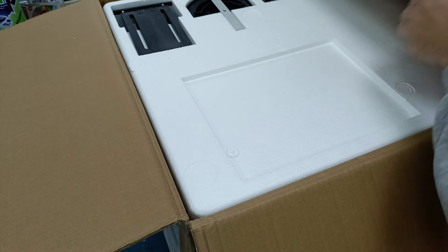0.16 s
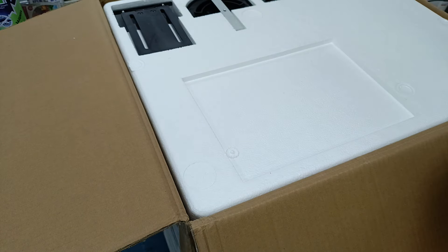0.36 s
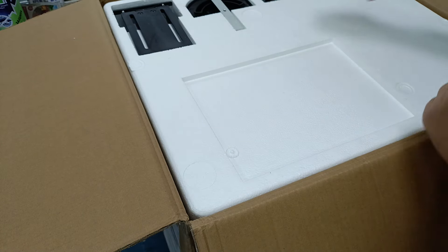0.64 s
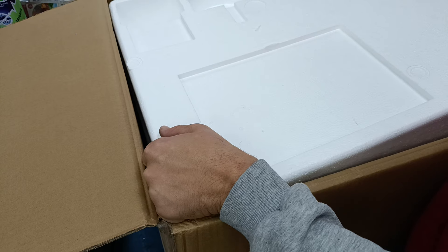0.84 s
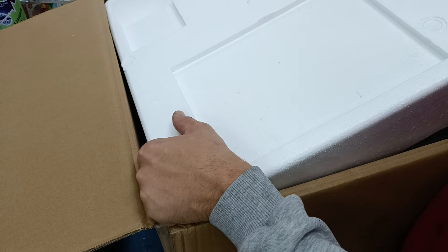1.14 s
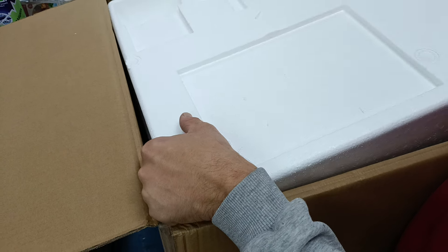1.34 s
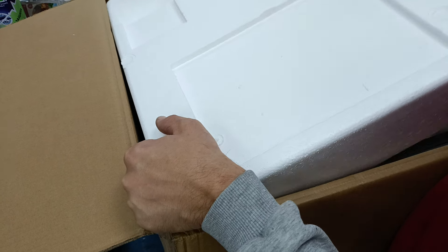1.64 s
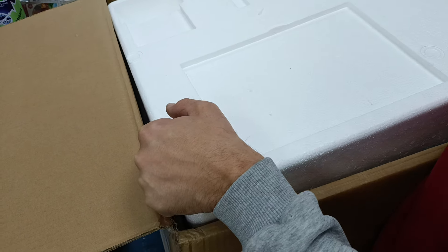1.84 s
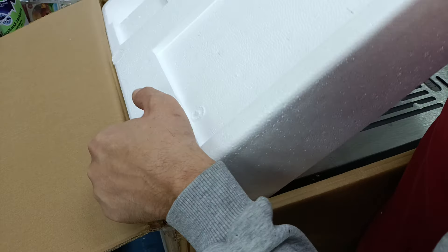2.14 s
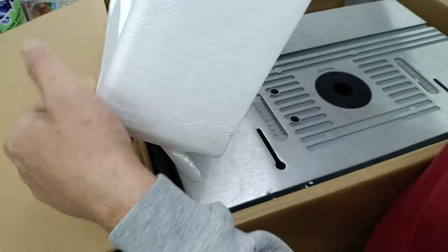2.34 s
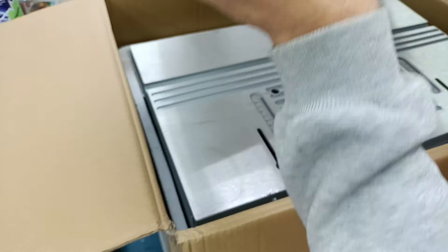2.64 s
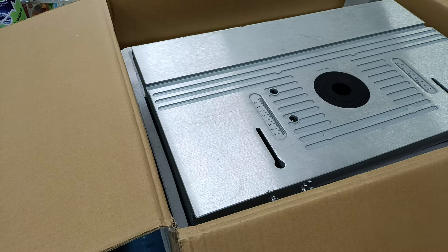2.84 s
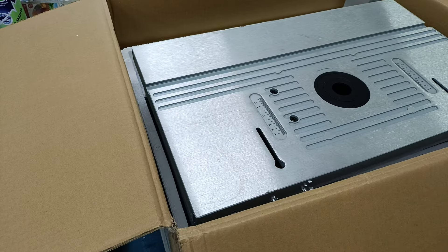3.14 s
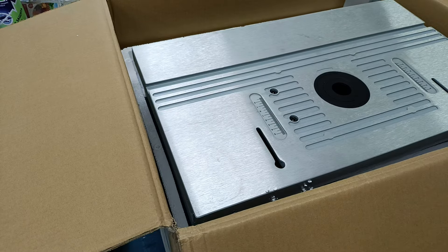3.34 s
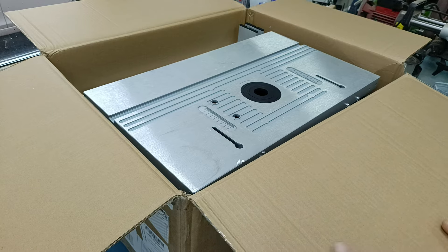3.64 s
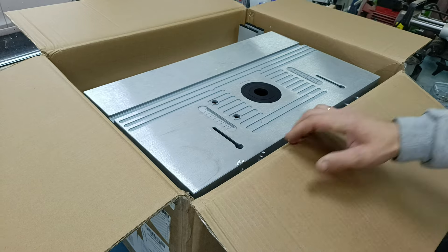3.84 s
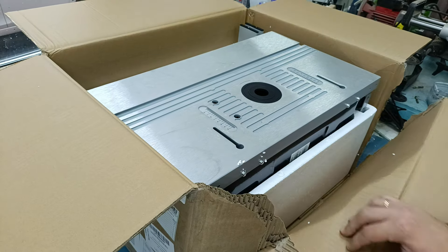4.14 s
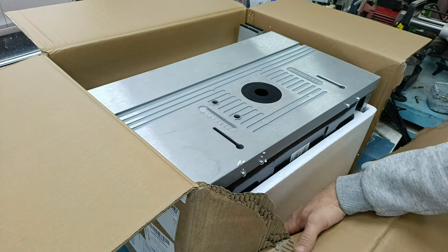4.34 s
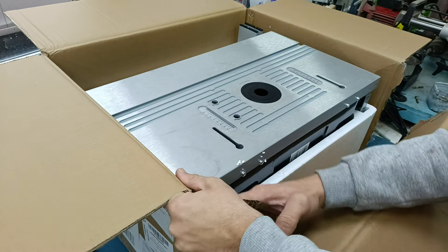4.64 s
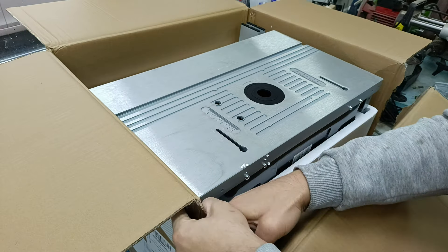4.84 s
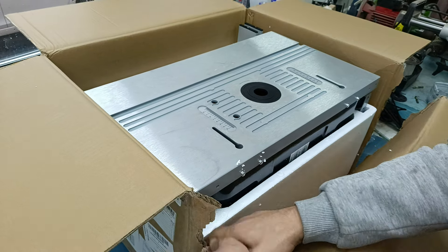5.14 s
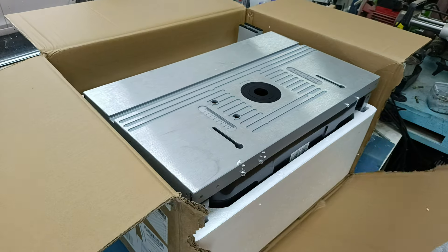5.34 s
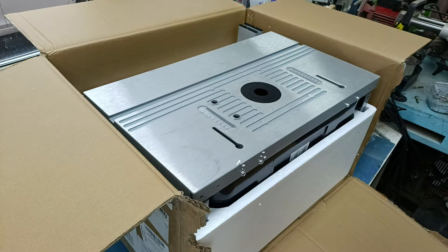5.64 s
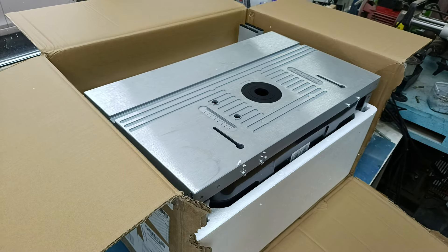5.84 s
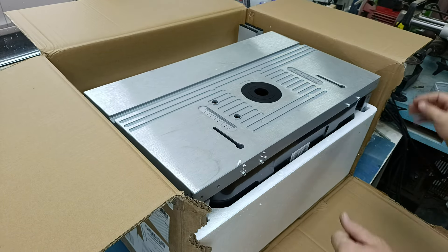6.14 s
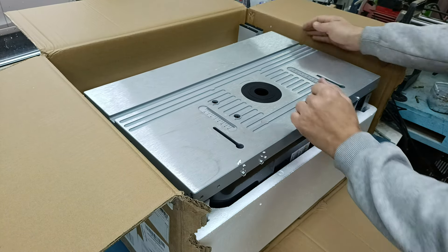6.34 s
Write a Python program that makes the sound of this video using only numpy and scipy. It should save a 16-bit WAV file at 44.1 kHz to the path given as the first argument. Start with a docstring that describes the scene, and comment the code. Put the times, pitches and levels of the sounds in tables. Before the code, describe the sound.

Foam packing squeaks and rasps out of a cardboard box and judders aside, then a cardboard flap scrapes, thumps and crackles.

```python
"""A foam lid squeaks and rasps as it is worked out of a cardboard box, close by in a small workshop. The foam
sticks and slips on the walls thousands of times a second, which makes the squeaks. Once free, the lid judders
hollowly as it is shoved aside. Then the scene changes: a cardboard side is pushed down, and it scrapes, thumps
and crackles. Behind it all are a short room echo, soft air noise and a faint whine."""
import sys
import numpy as np
from scipy import signal
from scipy.fft import rfft, irfft, next_fast_len
from scipy.io import wavfile
from scipy.ndimage import uniform_filter1d

SR = 44100
rng = np.random.default_rng(int(sys.argv[2]) if len(sys.argv) > 2 else 0)


def wav_record(signal):
    """Record a signal, one row per channel, as 16-bit PCM in the file named by sys.argv[1]."""
    frames = np.transpose(np.atleast_2d(signal))
    bounded = np.clip(frames, -1, 1)
    # unit amplitude maps onto the largest positive 16-bit level
    quanta = np.round(bounded * 32767).astype(np.int16)
    wavfile.write(sys.argv[1], SR, quanta)


N = 286164
TIME = np.arange(N) / SR
STOP_S, TOP_HZ = 3.394, 15900  # when the first scene ends and the second begins, echo and all; where the treble ends

# Levels in the tables are relative. A ring time (t60) is the time a sound takes to fade by 60 dB.
# Foam squeaks, plus one short rough snap of the cardboard in the last row. Each row: start in
# seconds, length in seconds, slips per second at the start and at the end, level in dB,
# roughness from 0 to 1.
SQUEAKS_AND_SNAP = [ (0.833, 0.011, 8760, 11300, -22.5, 0), (0.862, 0.011, 14000, 6600, -15.5, 0.28),
                    (0.869, 0.05, 4957, 1300, -19, 0.71), (.988, .014, 4470, 4700, -16.5, 0.16),
                    (0.996, 0.053, 4644, 4300, -34, 0.13), (1.078, 0.01, 8500, 17600, -19.5, .03),
                    (1.115, 0.015, 15100, 12200, -14, .18), (1.143, 0.025, 12060, 13300, -21, 0.19),
                    (1.185, .008, 14650, 8100, -18, 0.17), (1.187, 0.068, 7650, 7800, -28.5, 0.05),
                    (1.188, .12, 5220, 6000, -30.5, .1), (1.268, .012, 8320, 14000, -17, .1),
                    (1.312, 0.019, 9360, 14800, -17.5, 0.02), (1.343, .017, 13000, 5100, -21.5, 0.28),
                    (1.361, .042, 3570, 2380, -21, 0.07), (1.425, 0.023, 6500, 21000, -21.5, .2),
                    (1.479, 0.023, 14900, 4440, -19, 0.11), (1.526, 0.01, 8860, 12000, -17, .08),
                    (1.537, 0.063, 13500, 10500, -23, 0.26), (1.583, 0.041, 3190, 900, -20, 0.22),
                    (1.625, .038, 1048, 7400, -21, .25), (1.655, 0.037, 11900, 14400, -13.5, 0.23),
                    (1.693, 0.036, 11900, 8700, -19.5, 0.25), (1.749, 0.025, 4330, 7400, -19, 0.17),
                    (1.79, 0.059, 3190, 2600, -21.5, .8), (1.851, 0.053, 3390, 4860, -19, 0.6),
                    (1.929, 0.023, 4230, 8700, -18, .04), (1.956, .038, 9850, 13600, -16, 0.17),
                    (2.022, 0.046, 13080, 10000, -17, 0.24), (5.192, 0.0036, 3570, 4500, -23, 0.23)]
# Hand and foam rubbing in the box. Each row: start, swell time and hold time in seconds, then the
# levels of drumming, rasp and hiss in dB.
FOAM_RUBS = [ (0, .002, 0.66, -59, -64.5, -62), (.076, 0.0025, 0.36, -49.5, -53.5, -52),
             (.472, 0.0078, 0.03, -44, -48.5, -44), (.712, 0.023, 0.0026, -38, -27, -20),
             (.74, 0.032, 0.52, -40.5, -38.5, -42.5), (.88, 0.028, 0.047, -47.5, -23, -29),
             (.99, .034, 0.2, -45.5, -56, -31), (1.1, 0.022, 0.016, -26, -33.5, -24.5),
             (1.32, 0.0081, 0.67, -40, -36.5, -30.5), (2.065, 0.015, 0.053, -31.5, -32, -34),
             (2.147, 0.064, 0.048, -33, -24.5, -18.5), (2.25, .036, .035, -29, -26, -26.5),
             (2.32, 0.044, 0.02, -18.5, -19.5, -44), (2.39, 0.035, 0.12, -31.5, -35, -34.5),
             (2.56, 0.084, 0.025, -36.5, -33, -30.5), (2.74, 0.034, 0.17, -38, -47, -62)]
# The loose cardboard side (the flap) scraping as it bends down. Each row reads as in FOAM_RUBS.
FLAP_RUBS = [ (3.526, 0.0041, 0.25, -53.5, -62, -61.5), (3.733, 0.0044, 0.03, -42, -46, -51),
             (3.86, 0.11, 0.029, -24, -29.5, -34.5), (3.97, 0.019, 0.17, -30, -25.5, -26.5),
             (4.287, 0.0023, 0.051, -35.5, -34.5, -43), (4.36, 0.062, 0.041, -38, -35, -31.5),
             (4.49, 0.047, .25, -39.5, -42, -41), (4.79, 0.045, 0.057, -32.5, -33, -32.5),
             (4.9, 0.049, 0.014, -21, -22, -23.5), (4.95, 0.019, 0.071, -22.5, -27.5, -29.5),
             (5.04, 0.051, 0.026, -32.5, -42, -26), (5.14, 0.065, 0.18, -34.5, -33.5, -39),
             (5.261, 0.005, 0.067, -47, -25.5, -24.5), (5.27, 0.061, 0.032, -23, -27.5, -33.5),
             (5.39, 0.077, 0.19, -38.5, -43.5, -37.5), (5.68, 0.021, 0.16, -40.5, -42, -39.5),
             (5.91, 0.016, 0.11, -51, -53.5, -52.5), (6.03, .04, 0.24, -71, -73, -61),
             (6.345, 0.013, 0.34, -62.5, -60, -51)]
# Shoves of the lid. Each row: start, swell time and hold time in seconds, judder level in dB,
# rasp level in dB, pitch of the shove's tone in Hz, level of that tone in dB.
SHOVES = [(2.798, 0.048, 0.056, -19, -37.5, 572, -27.5), (2.969, 0.0035, 0.11, -14.5, -33, 400, -28.5),
          (2.977, 0.014, .003, -32, -18, 4430, -27), (3, 0.023, 0.019, -17.5, -48, 1418, -22.5),
          (3.087, 0.041, 0.031, -13.5, -29, 171.3, -21.5), (3.224, 0.018, 0.049, -14, -26, 840, -21.5),
          (3.291, 0.015, .06, -19, -52, 292.5, -24.5), (3.35, 0.025, 0.026, -25, -27, 541, -24)]
# Blows on the box and the flap. Each row: start in seconds, level in dB, treble cutoff in Hz
# (lower for a softer contact).
BOX_KNOCKS = [(0.207, -42.5, 296), (0.279, -31.5, 160), (.364, -38, 700), (.479, -23.5, 1000),
              (0.884, -24.5, 1240), (6.112, -50, 150), (2.971, -23, 1194), (3.229, -17, 1230),
              (4.969, -19.5, 1300), (5.966, -39.5, 130), (6.351, -48, 200)]
FLAP_THUMPS = [(3.742, -33.5, 286), (3.867, -24, 640), (4.292, -19.5, 616), (4.3, -15, 570)]
# Foam beads and paper fibres snapping. Each row: start in seconds, level in dB, treble tilt in dB
# per octave.
SNAPS = [(0.082, -34, 2), (2.149, -15, 1.5), (2.324, -14.5, 0), (2.637, -22.5, -1), (2.654, -20.5, 4.5),
         (3.938, -22.5, 1.5), (3.996, -22, 4), (4.028, -18.5, 6), (4.088, -15.5, 4), (4.733, -25, -0.5),
         (4.921, -15.5, 5), (5.084, -31.5, 2.5), (5.262, -19.5, 2)]
# The lid lurching against the box wall. Each row: start in seconds, level in dB.
JOLTS = [(1.13, -15.5), (1.162, -23.5), (1.449, -25), (1.48, -28.5), (1.557, -33), (1.673, -21),
         (1.689, -24), (1.768, -23.5), (2.206, -23)]

# Modes are the pitches a thing rings at: here the box's, the flap's, and the flap's higher ones as
# it is scraped and bent. Each row: pitch in Hz, level in dB, ring time in seconds.
BOX_MODES = [(138, -15, 0.097), (182, -14, .069), (270, -2, 0.039), (369, -8, 0.088), (515.7, -5, 0.052),
             (630, -6, .15), (781, -3.5, 0.031)]
FLAP_MODES = [(218, -8, 0.14), (293, 0, 0.1), (386, -1.5, 0.11), (446, -5, 0.12), (620, -3.5, 0.082)]
FLAP_HIGH_MODES = [(341, -0.5, 0.13), (548.6, 5, 0.083), (671.5, 0.5, 0.11), (747, -4.5, 0.1),
                   (817, -2.5, 0.19)]
# The lid's hollow modes. Each row: pitch in Hz, level in dB.
LID_MODES = [(135, -10.5), (173, -11), (266, -1.5), (304, 1), (352, 0), (409, 4), (459, -2.5), (540, 4.5),
             (666, 0.5), (714, 0.5), (838, 2.5), (1110, -5), (1410, -14.5)]

# Tone colours: how strong each noise is from bass to treble. Each row: frequency in Hz, level in dB.
BOX_COLOUR = [(45, -41), (80, -21.5), (130, 2.5), (320, 8), (1000, -3), (2000, -21), (6000, -65.5)]
FLAP_COLOUR = [(40, -55), (110, -5), (200, -5.5), (300, -1), (720, -12.5), (1050, -13), (2000, -23.5),
               (6000, -50)]
RASP_COLOUR = [(200, -56.5), (700, -0.5), (1300, -1), (2500, -3), (5000, -8.5), (8000, -12.5), (16000, -17)]
HISS_COLOUR = [(1500, -28), (4500, -12.5), (7000, -9.5), (10000, -2), (13000, -1.5), (16000, -12)]
LID_COLOUR = [(30, -38), (85, -42.5), (140, 5), (205, -12.5), (290, 6), (830, 6), (1600, -8), (3000, -34.5),
              (6000, -58)]
LID_RASP_COLOUR = [(2000, -6), (6000, -13.5), (11000, -11), (16000, -15)]
SNAP_COLOUR = [(30, -66), (100, -20), (200, 5), (400, 7.5), (1300, 11), (2500, 3), (5000, -3), (11000, 1),
               (16000, -1)]
AIR_COLOUR = [(30, -25), (250, -6), (2200, -10), (16000, -26.5)]

# How long the room echoes. Each row: frequency in Hz, ring time in seconds.
ROOM_T60 = [(150, 0.46), (600, 0.17), (7000, 0.28), (16000, 0.25)]
# How alike left and right sound. Each row: frequency in Hz, likeness from 0 (unrelated) to 1 (same).
STEREO_LIKENESS = [(350, 0.93), (700, 0.73), (1400, 0.32), (5000, 0.02)]


def squeaks_and_snap(jitter_hz=3200, waver_hz=600, sag_db=3, edge_db=-8, wall_t60=0.021):
    """Foam sticks and slips very fast; its uneven beads shake both the rate and the force.
    One very short burst of the same kind makes a rough snap of the cardboard."""
    out, t = np.zeros((2, N)), np.arange(2048) / SR
    for start, length, first_hz, last_hz, db, rough in SQUEAKS_AND_SNAP:
        size = max(int(length * SR), 64)
        glide = np.linspace(np.log(first_hz), np.log(last_hz), size)
        shake = 0.5 * wander(size, jitter_hz) + 0.3 * wander(size, waver_hz)
        hz = np.exp(glide + rough * shake)
        # the middle of the contact squeals; its edge slips raggedly around the same rate
        edge_hz = hz * np.exp(0.25 * wander(size, jitter_hz))
        slips = slip_tone(hz) + amp(edge_db) * slip_tone(edge_hz)
        # the force is greatest as the contact breaks loose
        sag = amp(-sag_db * np.linspace(-0.5, 0.5, size))
        flutter = np.exp(0.24 * wander(size, waver_hz))
        force = flutter * sag * signal.windows.tukey(size, 128 / size)
        # each sound starts at another spot, so the box walls scatter it differently
        walls = rng.standard_normal((2, len(t))) * 1000 ** (-t / wall_t60)
        walls[[0, 1], rng.integers(0, 8, size=2)] += np.linalg.norm(walls[0])  # the direct sound
        heard = signal.fftconvolve((slips * force)[None], walls, axes=1)
        add(out, start, amp(db) * heard * np.sqrt(size / (heard ** 2).sum(1, keepdims=True)))
    return out


def slip_tone(hz, brightness=0.13):
    """Sharp slips, hz times a second, make a tone rich in overtones."""
    phase = 2 * np.pi * np.cumsum(hz) / SR
    harmonic = np.arange(1, 15)[:, None]
    below_top = np.clip((TOP_HZ - harmonic * hz) / 1000, 0, 1)
    return (harmonic ** brightness * below_top * np.cos(harmonic * phase)).sum(0)


def rubbing():
    """Small slips rasp and hiss, coarser ones drum on the box or flap, and bent fibres crackle."""
    fine = friction(per_s=300, spread_db=2.6, t60=0.02, smooth=0.8)
    coarse = friction(per_s=130, spread_db=1.2, t60=0.018, smooth=0.5)
    fibres = friction(per_s=110, spread_db=3.5, t60=0.005, smooth=0)
    fine, coarse = moving_contact(fine), moving_contact(coarse)
    foam_drum, foam_rasp, foam_hiss = rub_levels(FOAM_RUBS)
    flap_drum, flap_rasp, flap_hiss = rub_levels(FLAP_RUBS)
    box = colour(coarse, BOX_COLOUR) + amp(-4) * ringing(coarse, BOX_MODES)
    flap = colour(coarse, FLAP_COLOUR) + amp(-9) * ringing(coarse, FLAP_MODES)
    flap += amp(-2) * ringing(coarse, FLAP_HIGH_MODES)
    drumming = amp(-1) * (foam_drum * unit(box) + flap_drum * unit(flap))
    rasp = (foam_rasp + flap_rasp) * colour(fine, RASP_COLOUR)
    hiss = (foam_hiss + flap_hiss) * colour(fine, HISS_COLOUR)
    crackle = amp(-15) * np.hypot(flap_rasp, flap_hiss) * colour(fibres, SNAP_COLOUR)
    return catches() * (drumming + rasp + hiss + crackle)


def friction(per_s, spread_db, t60, smooth):
    """Tiny slips of uneven size, each a burst of noise, on top of smooth sliding noise."""
    slips = (rng.random(N) < per_s / SR) * amp(spread_db * np.minimum(rng.exponential(1, N), 3.5))
    power = signal.lfilter([1], [1, -1000 ** (-2 / (t60 * SR))], slips ** 2)
    return stereo_noise(N) * np.sqrt(power / power.mean() + smooth)


def moving_contact(pair, depth_db=2.5):
    """The contact moves across the cardboard, so its resonances come and go."""
    bands = signal.stft(pair, nperseg=512)[2]
    patches = uniform_filter1d(rng.standard_normal(bands.shape[1:]), size=3, axis=0)
    patches = unit(uniform_filter1d(patches, size=9, axis=1))
    return signal.istft(bands * amp(depth_db * patches), nperseg=512)[1][:, :N]


def catches(per_s=66, t60=0.022, depth=0.18):
    """The contact catches now and then: the force jumps and sags again."""
    jumps = (rng.random(N) < per_s / SR) * rng.uniform(0.22, 1, N)
    return unit(1 + depth * signal.lfilter([1], [1, -1000 ** (-1 / (t60 * SR))], jumps))


def rub_levels(rubs):
    """Drumming, rasp and hiss all follow the force of each rub."""
    forces = np.array([stroke(*row[:3], fade_db_per_s=202.5) for row in rubs])
    gains = amp([row[3:] for row in rubs]).T
    return np.sqrt(gains ** 2 @ forces ** 2)


def stroke(start, swell, hold, fade_db_per_s, sag_db=3.5):
    """The force of one push: it swells, sags a little while held, and dies as the hand slows."""
    force, t = np.zeros(N), np.arange(0, swell + hold + 0.5, 1 / SR)
    rise = np.minimum(t / swell, 1) ** 0.73
    held_db = sag_db * np.clip((t - swell) / hold, 0, 1)
    faded_db = fade_db_per_s * np.maximum(t - swell - hold, 0)
    add(force, start, rise * amp(-held_db - faded_db))
    return force


def ringing(drive, modes):
    """A body, shaken by the drive, rings at its own pitches."""
    t = np.arange(SR // 3) / SR
    ring = sum(amp(db) * np.cos(2 * np.pi * hz * t) * 1000 ** (-t / t60) for hz, db, t60 in modes)
    return unit(convolve(drive, ring))


def lid_judder(rasp_hold_s=0.011, slide_db=-30):
    """The light lid chatters as it slides; friction drives its modes and one tone in each shove."""
    slips = friction(per_s=210, spread_db=-4.5, t60=0.03, smooth=1)
    modes = unit(sum(amp(db) * friction_tone(hz) for hz, db in LID_MODES))
    body = unit(colour(slips, LID_COLOUR) + 1.5 * modes)
    # friction damps the widest swings, so the judder stays even
    swing = np.abs(uniform_filter1d((body ** 2).mean(0), 512))
    body = unit(body / np.sqrt(1 + 3 * swing))
    judder_power, rasp_power, tones = 0, 0, 0
    for start, swell, hold, judder_db, rasp_db, hz, tone_db in SHOVES:
        # the lid judders all through a shove, but rasps mostly as it starts to slide
        force = stroke(start, swell, hold, fade_db_per_s=225.5)
        onset = stroke(start, swell, rasp_hold_s, fade_db_per_s=247)
        judder_power += (amp(judder_db) * force) ** 2
        rasp_power += (amp(rasp_db) * onset) ** 2
        tones += amp(tone_db) * force * friction_tone(hz)
    scrape = np.sqrt(rasp_power + amp(slide_db) ** 2 * judder_power) * colour(slips, LID_RASP_COLOUR)
    return (TIME < STOP_S) * (np.sqrt(judder_power) * body + tones + scrape)


def friction_tone(hz, drift=0.01803, drift_hz=70, swell_db=7, swell_hz=24):
    """A tone kept going by friction: it drifts and swells as the contact moves."""
    phase = 2 * np.pi * np.cumsum(hz * (1 + drift * wander(N, drift_hz))) / SR
    apart = np.arccos(value_at(STEREO_LIKENESS, hz)) * rng.choice([-0.5, 0.5])
    swell = amp(swell_db * np.tanh(wander(N, swell_hz)))
    return unit(swell * np.sin([phase + apart, phase - apart]))


def knocks(blows, body_modes, slap_db, lowest_hz, slap_t60=0.12, slap_hz=1500, detune=0.021):
    """Each blow slaps the cardboard and makes it ring; a soft contact leaves only the low modes."""
    out, t = np.zeros(N), np.arange(SR // 3) / SR
    hz, db, t60 = np.transpose(body_modes)[:, :, None]
    for start, blow_db, cutoff_hz in blows:
        mistune, offset = rng.standard_normal((2, len(hz), 1))
        phase = 2 * np.pi * hz * (1 + detune * mistune) * t + np.pi * offset
        ring = (amp(db) * 1000 ** (-t / t60) * np.sin(phase)).sum(0)
        slap = unit(filtered(rng.standard_normal(len(t)), 1, slap_hz)) * 1000 ** (-t / slap_t60)
        blow = filtered(ring + amp(slap_db) * slap, 2, cutoff_hz)
        blow = filtered(blow, 3, lowest_hz, "high")  # thin cardboard gives off no deep bass
        add(out, start, amp(blow_db) * blow / np.std(blow[:512]))
    return np.array([out, out])


def snaps(gain_db=2, crack_t60=0.051, tail_db=-14, tail_t60=0.48):
    """A caught edge lets go with a short crack and a weaker tail."""
    out, t = np.zeros((2, N)), np.arange(4096) / SR
    fade = 1000 ** (-t / crack_t60) + amp(tail_db) * 1000 ** (-t / tail_t60)
    for start, db, tilt in SNAPS:
        tilted = [(hz, level + tilt * np.log2(max(hz, 250))) for hz, level in SNAP_COLOUR]
        add(out, start, amp(db + gain_db) * colour(stereo_noise(len(t)), tilted) * fade)
    return filtered(out, 2, 130, "high")


def jolts(t60=0.033, band_hz=(170, 1500)):
    """The lid lurches a little way up the wall with a dull tick."""
    out, t = np.zeros((2, N)), np.arange(2048) / SR
    for start, db in JOLTS:
        tick = filtered(stereo_noise(len(t)), 2, band_hz, "band")
        add(out, start, amp(db) * unit(tick) * 1000 ** (-t / t60))
    return out


def room_echo(sound, cycle_hz=4):
    """The echoes change as the source and the arms move: three patterns take turns."""
    turn = 2 * np.pi * (cycle_hz * TIME + np.arange(3)[:, None] / 3)
    shares = np.maximum(np.cos(turn), 0)
    shares /= np.linalg.norm(shares, axis=0)
    return sum(convolve(sound * share, reflections()) for share in shares)


def reflections(delay_s=0.005):
    """One pattern of random bounces around the room; each frequency dies at its own speed."""
    bounces = rng.choice([-1., 1.], (2, SR // 2)) * (rng.random((2, SR // 2)) < 1 / 8)
    hz, t, bands = signal.stft(stereo(bounces), SR, nperseg=256)
    fade = amp(-60 * t / value_at(ROOM_T60, hz)[:, None])
    tail = signal.istft(bands * fade, SR, nperseg=256)[1]
    return np.pad(unit(tail) / np.sqrt(tail.shape[1]), ((0, 0), (round(delay_s * SR), 0)))


def workshop(air_db=-75, whine_hz=942, whine_db=-78):
    """Soft air noise and a faint steady whine."""
    air = colour(stereo_noise(N), AIR_COLOUR)
    whine = unit(np.sin(2 * np.pi * whine_hz * TIME))
    return amp(air_db) * air + amp(whine_db) * whine


def stereo(pair):
    """Blends two signals so left and right share the bass but have unrelated treble."""
    size = next_fast_len(pair.shape[-1], True)
    first, second = rfft(pair, size)
    likeness = value_at(STEREO_LIKENESS, np.fft.rfftfreq(size, 1 / SR))
    mid = first * np.sqrt((1 + likeness) / 2)
    side = second * np.sqrt((1 - likeness) / 2)
    return irfft(np.array([mid + side, mid - side]), size)[:, :pair.shape[-1]]


def stereo_noise(size):
    """White noise for left and right."""
    return stereo(rng.standard_normal((2, size)))


def wander(size, hz):
    """A random curve that heads for a new value hz times a second."""
    points = rng.standard_normal(4096)
    return np.interp(np.arange(size) * hz / SR, np.arange(len(points)), points)


def colour(x, table):
    """Gives x a tone colour, at an average level of 1."""
    size = next_fast_len(x.shape[-1], True)
    gains = amp(value_at(table, np.fft.rfftfreq(size, 1 / SR)))
    return unit(irfft(rfft(x, size) * gains, size)[..., :x.shape[-1]])


def value_at(table, hz):
    """Reads between a table's rows, on a scale of octaves."""
    row_hz, values = np.transpose(table)
    return np.interp(np.log(hz + 1), np.log(row_hz + 1), values)


def filtered(x, order, hz, keep="low"):
    """Keeps the lows, the highs or a band; a higher order cuts more steeply."""
    return signal.lfilter(*signal.butter(order, hz, keep, fs=SR), x)


def convolve(x, response):
    """Lets every sample of x set off a copy of the response."""
    return signal.fftconvolve(np.atleast_2d(x), np.atleast_2d(response), axes=1)[:, :N]


def add(mix, start, sound):
    """Mixes a sound in at a start time in seconds."""
    part = mix[..., max(round(start * SR), 0):][..., :sound.shape[-1]]
    part += sound[..., :part.shape[-1]]


def amp(db):
    """Turns dB into a multiplier."""
    return 10 ** (np.asarray(db) / 20)


def unit(x):
    """Scales x to an average (rms) level of 1."""
    return x / np.sqrt(np.mean(x ** 2) + 1e-20)


def scene():
    """Squeaks, rubbing and blows close by, each with its share of the room's echo."""
    slips = squeaks_and_snap()
    rubs = rubbing() + lid_judder()
    box = knocks(BOX_KNOCKS, BOX_MODES, slap_db=-6, lowest_hz=130)
    flap = knocks(FLAP_THUMPS, FLAP_MODES, slap_db=-10, lowest_hz=144)
    hits = box + flap + snaps() + jolts()
    to_room = amp(-4) * slips + amp(-7) * hits + amp(-12) * rubs
    before = TIME < STOP_S
    # the scene changes: the first scene ends with its echo, and the second starts with its own
    echo = room_echo(to_room * before) * before + room_echo(to_room * ~before)
    return slips + hits + rubs + echo + workshop()


def record(dry):
    """Cuts away the treble above TOP_HZ."""
    low_pass = signal.firwin(511, TOP_HZ, window=("kaiser", 9), fs=SR)
    return signal.oaconvolve(dry, low_pass[None], "same", axes=1)


dry = scene()
out = record(dry)
wav_record(out)
```